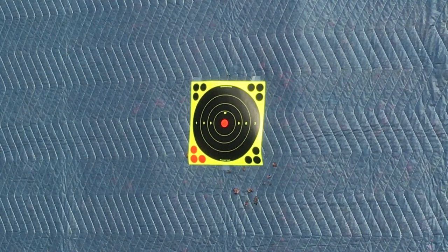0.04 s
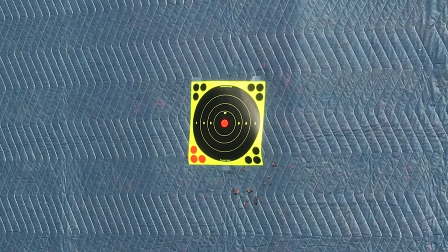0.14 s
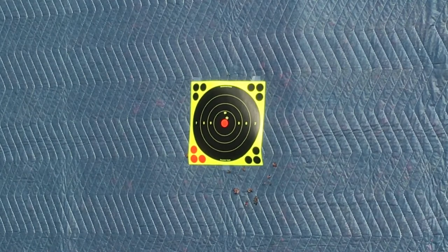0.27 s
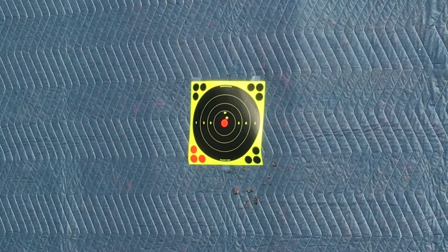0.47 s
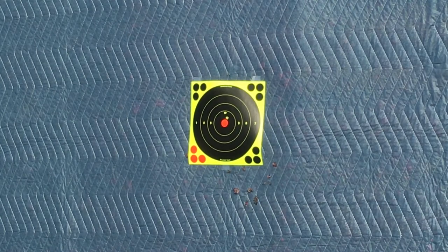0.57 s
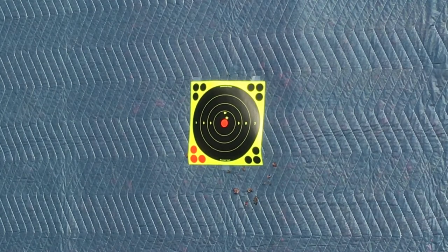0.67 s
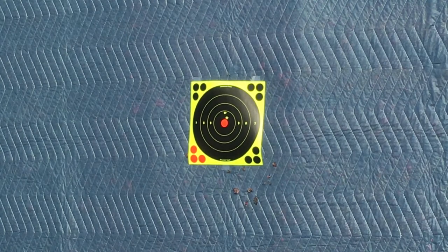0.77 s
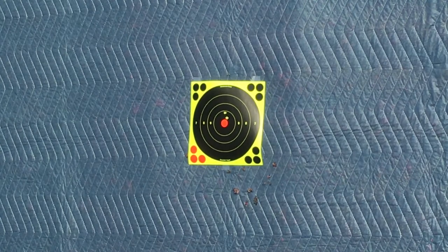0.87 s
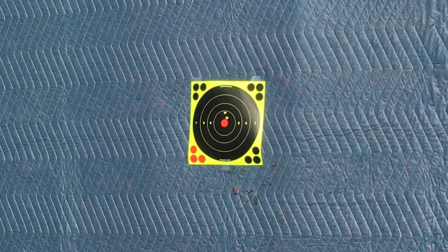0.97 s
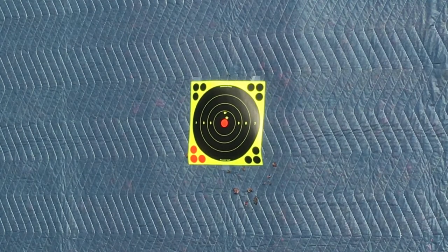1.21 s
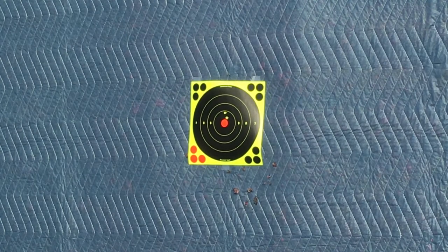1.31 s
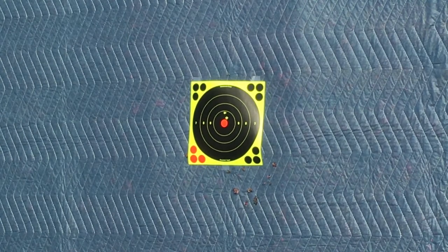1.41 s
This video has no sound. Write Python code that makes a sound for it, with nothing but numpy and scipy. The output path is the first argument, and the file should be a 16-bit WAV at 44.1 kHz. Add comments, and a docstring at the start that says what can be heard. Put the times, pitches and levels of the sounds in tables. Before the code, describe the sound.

One close air pistol crack outdoors, followed by light ticks over a distant motor hum.

```python
"""One shot from a gas pistol, close to the microphone: the valve lets out a puff of gas, then slide
and pellet clatter for 90 ms, set the metal ringing and overload the input. The surroundings
reverberate for half a second. Later come a few faint ticks and one dry snap. Far behind it all
a motor hums under a soft hiss."""
import sys
import numpy as np
from scipy import signal
from scipy.fft import rfft, irfft
from scipy.io import wavfile

SR = 44100
rng = np.random.default_rng(int(sys.argv[2]) if len(sys.argv) > 2 else 0)


def dump(signal):
    """Clip the signal to [-1, 1] and save it as 16-bit WAV at the path in sys.argv[1]."""
    limited = np.clip(np.atleast_2d(signal).T, -1, 1)
    pcm = np.round(limited * 32767).astype(np.int16)
    wavfile.write(sys.argv[1], SR, pcm)


N = 63945


def from_db(db):
    return 10 ** (np.asarray(db) / 20)


def rms_one(x):
    return x / np.sqrt(np.mean(x ** 2) + 1e-20)


def clock():
    return np.arange(N) / SR


def at_hz(points, hz):
    """Reads a table on a log-frequency axis."""
    f, value = np.transpose(points)
    return np.interp(np.log(hz + 1e-3), np.log(f), value)


def filtered(x, hz, kind, order=2):
    """Causal Butterworth filter."""
    sections = signal.butter(order, np.clip(hz, 5, .45 * SR), kind, fs=SR, output="sos")
    return signal.sosfilt(sections, x + 1e-18)


def noise(spectrum):
    """Noise of a given colour, rms 1."""
    gain = from_db(at_hz(spectrum, np.fft.rfftfreq(N, 1 / SR)))
    return rms_one(irfft(rfft(rng.standard_normal(N)) * gain, N))


def wavering_tone(hz, width_hz, rough):
    """A sine of rms 1 whose amplitude and phase wander by the share 'rough'."""
    offsets = np.fft.fftfreq(N, 1 / SR)
    white = rng.standard_normal(N) + 1j * rng.standard_normal(N)
    wander = np.fft.ifft(white * np.exp(-(2 * offsets / width_hz) ** 2))
    carrier = np.exp(2j * np.pi * (hz * clock() + rng.random()))
    return rms_one(np.real(carrier * (1 + rough * wander / np.std(wander))))


def envelope(start, hold, t60, attack_s=.0005):
    """Quick attack, short hold, exponential release."""
    age = clock() - start
    return np.clip(age / attack_s, 0, 1) * np.exp(-np.log(1000) * np.maximum(age - hold, 0) / t60)


# spectrum of the ambience: f/Hz, relative level/dB
HISS_SPECTRUM = [(20, -10), (50, -1), (80, -2.5), (130, -3), (200, -12), (300, -18), (450, -27),
                 (900, -26.5), (1500, -30), (3000, -33), (4400, -30.5), (5500, -39), (7500, -44),
                 (10000, -51.5), (12500, -59), (16000, -66.5)]

def hiss():
    """The steady noise of the place, soft and weighted to the lows."""
    return from_db(-42) * noise(HISS_SPECTRUM)


# harmonics of the motor: multiple, level/dB before the swell
HUM_HARMONICS = [(2, -45.5), (3, -55), (4, -55.5), (5, -63), (6, -63.5), (8, -73)]
# slow swell of the hum: t/s, gain/dB
HUM_SWELL = [(0, -3), (0.299, 0.5), (.58, 2), (1.0, -0.5), (1.4, 1.5)]

def distant_motor(motor_hz=59.4, rumble_hz=44.6):
    """A motor far from the microphone: wavering harmonics over a rough rumble."""
    hum = sum(from_db(db) * wavering_tone(k * motor_hz, width_hz=5, rough=.35)
              for k, db in HUM_HARMONICS)
    swell = from_db(np.interp(clock(), *np.transpose(HUM_SWELL)))
    rumble = from_db(-42.5) * wavering_tone(rumble_hz, width_hz=14, rough=1.2)
    return swell * hum + rumble


# colour of the reverberation: f/Hz, gain/dB
REVERB_COLOUR = [(60, -6.5), (200, 5), (480, -2.5), (1000, -2), (2000, -4), (3200, -0.5), (4300, -8.5),
                 (5500, -9), (7500, 0), (9500, -3), (14000, -4)]
# decay of the reverberation: f/Hz, t60/s
REVERB_DECAY = [(100, 0.7), (500, 0.22), (1500, 0.53), (4000, 0.47), (8000, .39), (12000, 0.3),
                (16000, .18)]

def surroundings(x, delay_s=.0051, build_s=.0037):
    """Diffuse reflections around the microphone: each band's energy builds and dies, carried by noise."""
    hz, out = np.fft.rfftfreq(N, 1 / SR), np.zeros(N)
    delayed = np.pad(x, (int(delay_s * SR), 0))[:N]
    scatter = rfft(rng.standard_normal(N))
    build_pole = np.exp(-1 / (build_s * SR))
    centres = np.linspace(50 ** .5, 18000 ** .5, 22) ** 2
    for low, centre, high in zip(centres, centres[1:], centres[2:]):
        decay_pole = 1e-6 ** (1 / (at_hz(REVERB_DECAY, centre) * SR))
        energy = filtered(delayed, [(low + centre) / 2, (centre + high) / 2], "band") ** 2
        for pole in (build_pole, decay_pole):
            energy = signal.lfilter([1 - pole], [1, -pole], energy)
        carrier = rms_one(irfft(scatter * np.interp(hz, [low, centre, high], [0, 1, 0]), N))
        out += from_db(at_hz(REVERB_COLOUR, centre)) * np.sqrt(energy) * carrier
    return out


def snap(start_s=1.2553, low_hz=1690, high_hz=8788):
    """One dry, very short snap: a band-limited spike."""
    spike = np.zeros(N)
    spike[int(start_s * SR)] = from_db(-13.5)
    return filtered(filtered(spike, low_hz, "high"), high_hz, "low", order=5)


# small contacts: t/s, level/dB, t60/s
TICK_EVENTS = [(0.4694, -24.5, 0.016), (1.0258, -37, 0.017), (1.0502, -35, .015), (1.155, -41, .016),
               (1.16, -48, 0.026), (1.179, -47.5, .03)]
# spectrum of a tick: f/Hz, relative level/dB
TICK_SPECTRUM = [(500, -25), (2000, 3), (3000, -8), (3700, 14), (5000, -7), (6200, 8), (7000, -22),
                 (8000, -6.5), (10500, -13), (14000, -34)]

def ticks():
    """Light contacts that die quickly, perhaps a pellet dropping and then the gun being handled."""
    return noise(TICK_SPECTRUM) * sum(from_db(db) * envelope(s, 0, t60) for s, db, t60 in TICK_EVENTS)


def gas_puff(start_s=.2484, length_s=.0062, thump_hz=308):
    """Close to the muzzle: one push of pressure, a long shallow suction and a short hollow thump."""
    age = clock() - start_s
    pulse = np.sin(np.pi * np.clip(age / length_s, 0, 1))
    push = filtered(pulse, hz=6, kind="high", order=1)  # the undershoot is the suction
    thump = np.sin(2 * np.pi * thump_hz * age) * envelope(start_s, hold=0, t60=.06)
    return from_db(-3) * push + from_db(-14) * thump


def struck_part(start, hz, sag_hz=1095, sag_s=.0027):
    """A rough ring that starts sharp and settles, as when a struck part's higher partials die."""
    age = np.maximum(clock() - start, 0)
    extra_cycles = sag_hz * sag_s * (1 - np.exp(-age / sag_s))
    tone = signal.hilbert(wavering_tone(hz, width_hz=1000, rough=.7))
    return np.real(tone * np.exp(2j * np.pi * extra_cycles))


# hammer, gas blast and the clacks that follow:
# t/s, crack level/dB, hold/s, t60/s, bass gain/dB, ring f/Hz, ring level/dB
BLOWS = [(0.2447, -18, .001, .016, -6, 3800, -20), (0.2477, 1, .002, .010, -9, 5800, 0),
         (0.2497, -3, .003, .026, 4, 3600, 0), (0.2623, 1, .004, .024, -4, 3500, 1),
         (0.2722, -6, .0025, .016, -5, 3300, -2), (0.2780, -16, .004, .014, -4, 8200, -18),
         (0.2878, -1, .005, .017, 1, 3980, 11), (0.3022, -7, .003, .032, 0, 3900, -9),
         (0.3161, -5, .002, .018, -2, 4150, 6), (0.3295, -19, .005, .025, 0, 3950, -11)]
# spectrum of a crack: f/Hz, relative level/dB
CRACK_SPECTRUM = [(60, -18), (250, -4.5), (500, -11.5), (1000, -1.5), (1600, -3), (2800, 1.5), (4200, 0.5),
                  (5400, -2.5), (7000, -2), (9000, -2.5), (11000, -12.5), (13000, -24), (16000, -35.5)]

def clacks(bass_hz=1398, ring_hold_share=.52):
    """The shot at close range: each blow is a broad crack and a short, hard ring of the part struck."""
    out = np.zeros(N)
    for start, crack_db, hold, t60, bass_db, ring_hz, ring_db in BLOWS:
        crack = noise(CRACK_SPECTRUM)
        crack += (from_db(bass_db) - 1) * filtered(crack, bass_hz, "low", order=1)  # bass shelf
        out += from_db(crack_db) * crack * envelope(start, hold, t60)
        ring = struck_part(start, ring_hz) * envelope(start, hold * ring_hold_share, t60=.0079)
        out += from_db(ring_db) * ring
    return out


# modes of slide and frame: f/Hz, level/dB relative to the crack, t60/s
GUN_MODES = [(2760, -37, 0.23), (3660, -28.5, .2), (3945, -35, 0.23), (4120, -22.5, .25),
             (4360, -28.5, 0.4), (4560, -31, .25), (4436, -32, .2), (4950, -30.5, 0.15), (5854, -32, .2),
             (8930, -40, .2)]

def gun_body():
    """Every blow also sets the long modes of slide and frame ringing."""
    out = np.zeros(N)
    for start, crack_db, *_ in BLOWS:
        for hz, db, t60 in GUN_MODES:
            mode = np.sin(2 * np.pi * (hz * clock() + rng.random()))
            out += from_db(crack_db + db) * mode * envelope(start, 0, t60)
    return out


def scene():
    """At one microphone: the pistol close by, its reflections, and the motor in the distance."""
    shot, ticking = clacks() + gun_body(), ticks()
    reflections = surroundings(from_db(-10.5) * shot + from_db(-10) * ticking)
    direct = shot + gas_puff() + ticking + snap()
    return (direct + reflections + distant_motor() + hiss())[None]


def record(dry, ceiling=.97, cutoff_hz=15600):
    """The close shot overloads the microphone input; a steep low-pass cuts the top."""
    clipped = dry / (1 + (dry / ceiling) ** 8) ** (1 / 8)
    return signal.sosfilt(signal.cheby1(12, .2, cutoff_hz, fs=SR, output="sos"), clipped)


dry = scene()
out = record(dry)
dump(out)
```